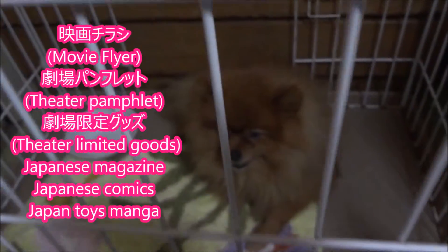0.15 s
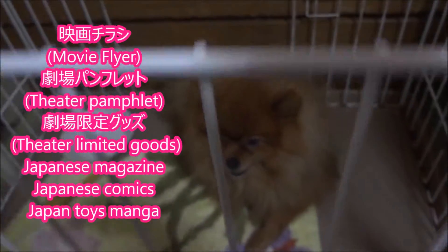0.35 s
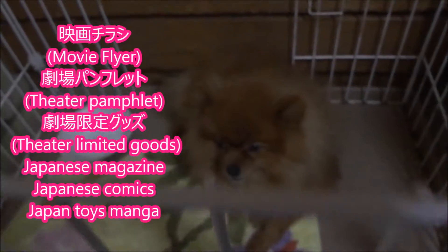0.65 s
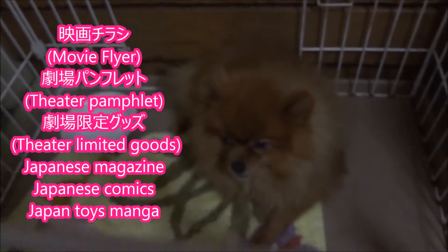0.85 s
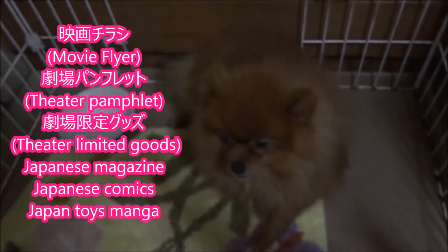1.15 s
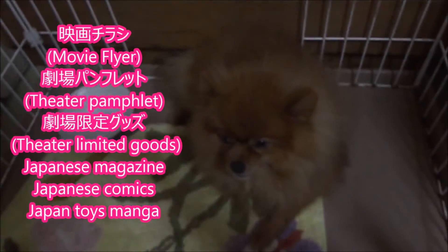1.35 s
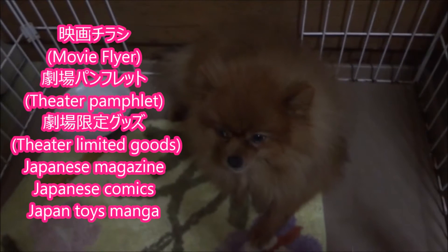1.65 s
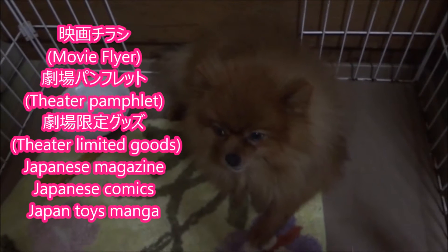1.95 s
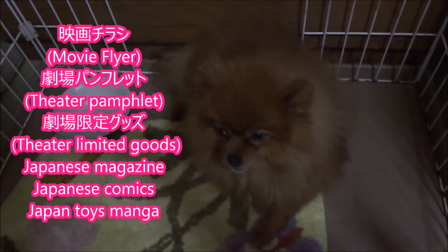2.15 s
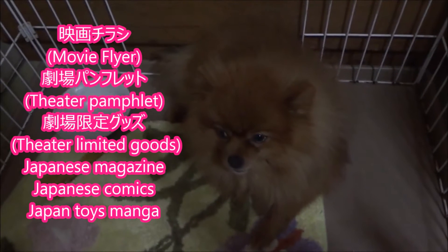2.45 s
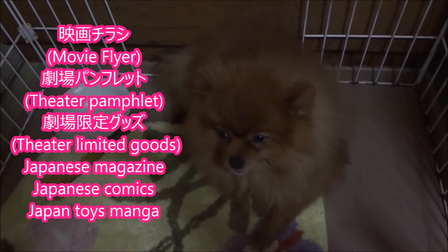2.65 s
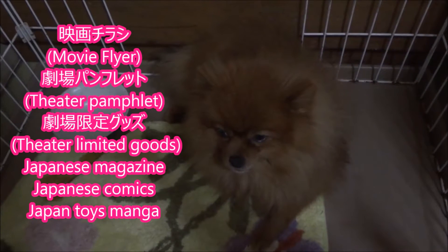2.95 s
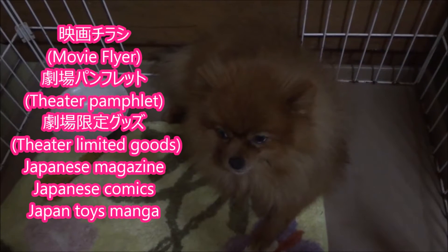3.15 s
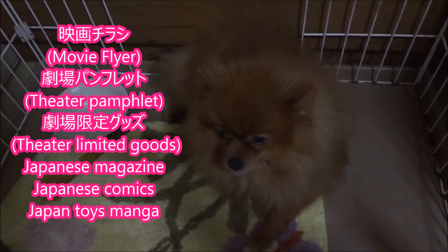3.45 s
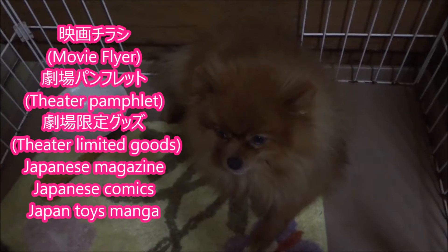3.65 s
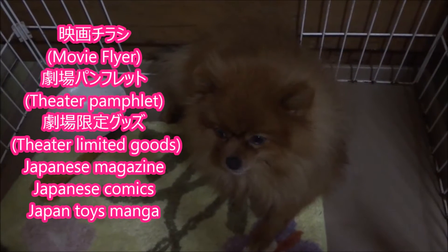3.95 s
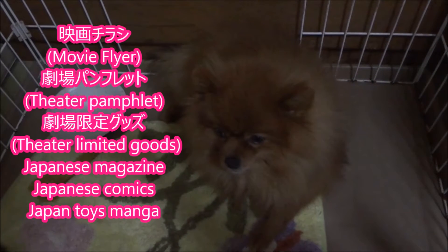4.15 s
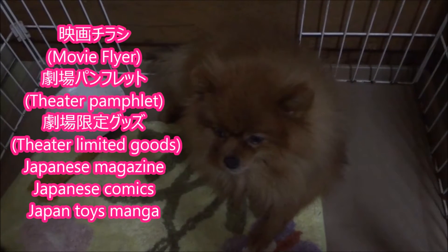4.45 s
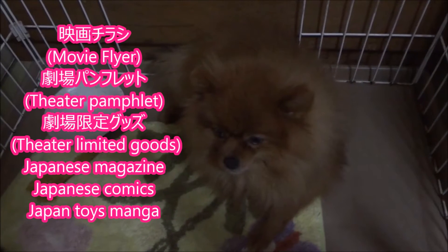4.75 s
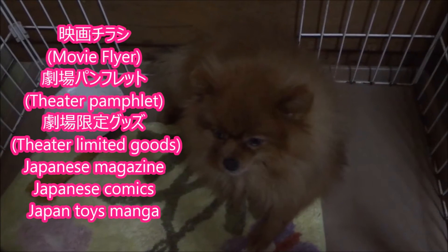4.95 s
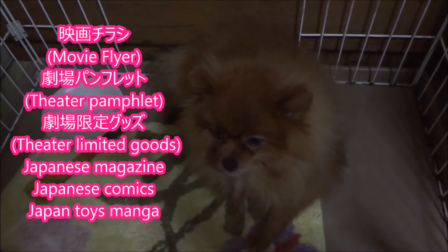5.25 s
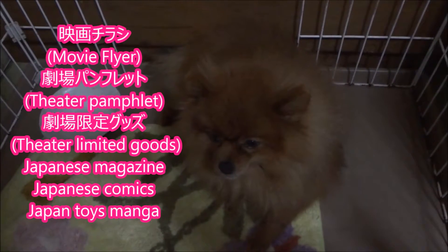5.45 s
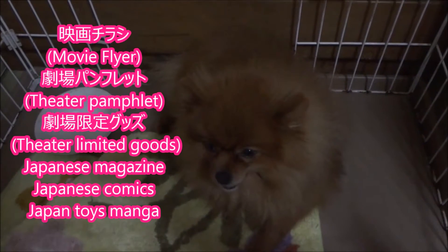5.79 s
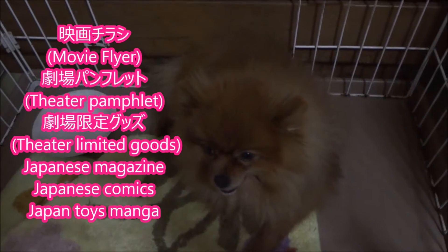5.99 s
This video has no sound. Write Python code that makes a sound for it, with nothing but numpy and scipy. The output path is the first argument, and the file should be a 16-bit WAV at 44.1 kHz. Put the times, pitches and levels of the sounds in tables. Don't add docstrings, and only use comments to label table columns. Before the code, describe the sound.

Indoors, close and nearly centred, a little dog sneezes with a burst of nasal air and a fast rattle, then snorts inward twice, the first with a low throat thump. It growls in a throaty, purring flutter that ends as a steady hum sinking away. A quiet gap leaves only room hiss, mains hum and a very high faint whine. Then dry crackling breath builds into a stronger, rising, toothy growl, cut off at its loudest.

```python
import sys
import numpy as np
from scipy import signal
from scipy.fft import rfft, irfft
from scipy.io import wavfile
from scipy.ndimage import uniform_filter1d

SR = 44100
rng = np.random.default_rng(int(sys.argv[2]) if len(sys.argv) > 2 else 0)


def to_wav(sig):
    pcm = np.clip(np.atleast_2d(sig), -1, 1) * 32767
    pcm = np.round(pcm).astype(np.int16)
    wavfile.write(sys.argv[1], SR, pcm.T)


def voltage_ratio(decibels):
    exponent = np.asarray(decibels, float) / 20
    return 10 ** exponent


N = 269892
T = np.arange(N) / SR
SECOND_GROWL_S = 4.5


def evened(x):
    return x / np.sqrt(np.mean(x ** 2) + 1e-20)


def curve(rows, count=1, quiet=None):
    return np.interp(T, [r[0] for r in rows], [r[count] for r in rows], quiet, quiet)


def level(rows, count=1):
    return voltage_ratio(curve(rows, count=count, quiet=-120))


def read(points, hz):
    f, value = np.transpose(points)
    return np.interp(np.log(hz + 1), np.log(f + 1), value)


def tone(hz, sway=0):
    return np.sqrt(2) * np.sin(2 * np.pi * np.cumsum(hz * np.ones(N)) / SR + sway)


def hiss(spectrum):
    gain = voltage_ratio(read(spectrum, np.fft.rfftfreq(N, 1 / SR)))
    return evened(irfft(rfft(rng.standard_normal(N)) * gain, N))


def wobble(samples):
    slow = uniform_filter1d(rng.standard_normal(N), samples)
    return evened(uniform_filter1d(slow, samples))


def resonate(x, hz, width):
    turn = np.exp(2j * np.pi * np.cumsum(hz * np.ones(len(x))) / SR)
    r = np.exp(-np.pi * width / SR)
    return 2 * (turn * signal.lfilter([(1 - r) ** 2], [1, -2 * r, r * r], x / turn)).real


def tract(x, modes, shift=1):
    return sum((-1) ** k * voltage_ratio(db) * resonate(x, hz * shift, w) for k, (hz, w, db) in enumerate(modes))


def blown(gain, modes, shift=1, pops=0):
    ring = tract(signal.unit_impulse(4096), modes, np.mean(shift))
    air = gain * rng.standard_normal(N) + pops
    end = N - np.argmax(gain[::-1] > 1e-5) + 4096
    sound = tract(air[:end], modes, (shift * np.ones(N))[:end])
    return np.pad(sound, (0, N - len(sound))) / np.linalg.norm(ring)


def growl():
    # (time [s], pitch [Hz])
    pitch_1 = [(1.5, 168.4), (1.55, 175.2), (1.67, 167.4), (1.78, 175.5), (1.85, 195.7), (2.1, 206.6),
               (2.21, 200.5), (2.29, 191.1), (2.77, 183.5)]
    pitch_held = [(2.8, 177.6), (2.91, 174.5), (3.348, 160), (3.406, 154.8), (3.44, 152.2), (3.498, 140.4),
                  (3.524, 132.3), (3.572, 113), (3.6, 108.7)]
    pitch_2 = [(5.5, 194.6), (5.534, 185.2), (5.634, 209.9), (5.708, 208.2), (5.832, 239), (5.98, 242),
               (6.018, 257.7), (6.12, 268.9)]
    # (time [s], pitch [Hz])
    chest_pitch = [(5.2, 198.5), (5.6, 211.9), (5.85, 218.9), (6.12, 234.4)]
    # (time [s], roughness [0-1])
    roughness = [(1.45, .95), (1.56, .33), (1.85, .15), (2.3, .12), (2.75, .08), (2.83, .015), (3.42, .015),
                 (3.6, .12), (5.0, .97), (5.48, .95), (5.62, .18), (5.75, .06), (6.12, .04)]
    # (time [s], upper throat breath [dB], upper overtones [dB], lower throat [Hz])
    lips = [(1.45, -14, 12, 690), (2.72, -14, -27, 668), (2.85, -20, 11, 655), (3.2, -23, 7, 668),
            (3.45, -15, 3, 625), (3.58, -6.5, 9, 592), (5.1, -5, -8, 673), (5.5, -12, -2, 618.5),
            (5.8, -11.5, 11, 719.4), (6.12, -3.5, 25, 734)]
    # (frequency [Hz], level [dB])
    overtones = [(150, 12), (250, 7), (705, 17.5), (873, 11), (1080, -18), (1430, 1.5), (1770, -31),
                 (2130, -31), (2700, -66), (3390, -43), (3670, -58.5), (4660, -72), (6000, -58),
                 (7800, -88), (13200, -120)]
    # (frequency [Hz], level [dB])
    second_dip = [(230, 26), (300, 10.5), (330, 10), (360, -1), (400, -12), (470, -3), (540, 8.5)]
    # (factor on its frequency [1], width [Hz], level [dB])
    throat_low = [(0.938, 160, 8.5), (1.202, 167, -3)]
    # (frequency [Hz], width [Hz], level [dB])
    throat_high = [(1200, 200, -17), (1395, 105, 0), (1670, 130, -16)]

    voice, breath, chest, pops = palate()
    rough = curve(roughness)
    hz = curve(pitch_1 + pitch_held + pitch_2)
    hz = hz * (1 + 0.02954 * rough * wobble(90) + 0.0043 * wobble(600))
    turns = 2 * np.pi * np.cumsum(hz) / SR
    tones, drift = 0, wobble(500)
    for k in range(2, 12):
        upper = np.clip((k * hz - 1000) / 200, 0, 1)
        db = read(overtones, k * hz) + curve(lips, count=2) * upper
        if k == 2:
            db = db + read(second_dip, k * hz)
        db = db + 1.3 * np.roll(drift, 9000 * k)
        tones = tones + voltage_ratio(db) * np.cos(k * turns - .45 * k ** 1.7)
    puffs = breath * (1 + 0.52 * np.cos(turns))

    mouth = np.sqrt(1 - rough) * voice * tones / np.sqrt(uniform_filter1d(tones ** 2, 6000))
    mouth += blown(np.sqrt(rough) * puffs, throat_low, curve(lips, count=3), pops)
    rasp = 0.29 * np.sqrt(rough * (1 - rough)) * puffs
    mouth += blown(rasp, [(1090, 430, 0)])
    mouth += voltage_ratio(curve(lips)) * blown(puffs, throat_high, pops=2.4 * pops)
    windpipe = 0.33 * np.sqrt(rough) * uniform_filter1d(chest, 900)
    mouth += blown(windpipe, [(300, 190, 0)])

    chest_hz = np.where(T < SECOND_GROWL_S, hz, curve(chest_pitch) * (1 + 0.042 * wobble(300)))
    chest_tone = np.sqrt(2) * chest * np.cos(2 * np.pi * np.cumsum(chest_hz) / SR)
    return mouth + chest_tone + nose(breath)


def palate():
    # (time [s], mouth level [dB], chest level [dB])
    held = [(2.785, -28.5, -49), (2.805, -23, -22.5), (2.9, -26.5, -22), (2.96, -27, -22.5),
            (3.341, -29.5, -25.5), (3.441, -33, -28), (3.56, -35.5, -40.5), (3.585, -40.5, -36),
            (3.605, -52.5, -80), (3.66, -65, -77)]
    bounce_s, bounce_db = .018, -9
    voice, breath, chest, pops = level(held), level(held), level(held, count=2), np.zeros(N)
    for s, open_s, mouth_db, chest_db, leak_db in flaps():
        part = slice(round(s * SR), min(round((s + .07) * SR), N))
        t = T[part] - s
        shut = 1 / (1 + np.exp((t - open_s) / .0022))
        fade = np.clip((.055 - t) / 0.0022, 0, 1)

        burst_s = 0.00585 * voltage_ratio(.5 * (leak_db + 15.5))
        voiced = voltage_ratio(mouth_db) * (1 - np.exp(-t / burst_s)) * shut
        voice[part] = np.maximum(voice[part], voiced)

        snap = 1.03 + 0.83 * np.exp(-t / 0.011)
        blowing = voltage_ratio(mouth_db) * np.maximum(snap * shut, 2.57 * voltage_ratio(leak_db) * fade)
        breath[part] = np.maximum(breath[part], blowing)

        swell = np.sin(np.pi / 2 * np.clip(t / (0.95 * open_s), 0, 1)) ** 0.83
        shut_share = 0.19 if s > SECOND_GROWL_S else 0.029
        chesty = voltage_ratio(chest_db) * (swell * shut + shut_share * fade)
        chest[part] = np.maximum(chest[part], chesty)

        pop_db = 4 if s <= SECOND_GROWL_S else 9 if s <= 5.62 else 1
        pop = voltage_ratio(mouth_db - 1.2 * leak_db + pop_db)
        pops[part.start] = pop
        if 5.25 < s < 5.5:
            for k in (1, 2):
                pops[part.start + round(k * bounce_s * SR)] += pop * voltage_ratio(k * bounce_db)
    pops = uniform_filter1d(pops, size=12, origin=-5)
    return uniform_filter1d(voice, 70), breath, uniform_filter1d(chest, 120), pops


def flaps():
    # (time [s], peak level [dB], open share of the gap to the next [0-1])
    flaps_1 = [(1.469, -30, 0.65), (1.482, -31, 0.65), (1.512, -28.5, 0.65), (1.542, -20.5, 0.47),
               (1.582, -19, 0.57), (1.617, -18.5, 0.55), (1.665, -17, 0.42), (1.715, -14.5, 0.42),
               (1.757, -17.5, 0.6), (1.799, -12.5, 0.61), (1.834, -12, 0.64), (1.879, -12.5, 0.62),
               (1.922, -13.5, 0.74), (1.962, -13, 0.63), (2.008, -11.5, 0.7), (2.052, -13.5, 0.9),
               (2.098, -11.5, 0.62), (2.144, -13.5, 0.75), (2.188, -13.5, 0.77), (2.234, -12.5, 0.84),
               (2.277, -14.5, 0.68), (2.335, -13.5, 0.76), (2.378, -14, 0.84), (2.433, -14.5, 0.77),
               (2.48, -14, 0.74), (2.525, -14.5, 0.79), (2.575, -16, 1), (2.622, -14, 0.78),
               (2.675, -14.5, 0.67), (2.734, -13.5, 0.85)]
    flaps_slack = [(5.079, -42.5, 0.1), (5.104, -42.5, 0.21), (5.13, -42, 0.19), (5.146, -36, 0.1),
                   (5.194, -39.5, 0.087), (5.219, -38.5, 0.2), (5.263, -30, 0.27), (5.31, -28.5, 0.14),
                   (5.356, -27.5, 0.24), (5.4, -31, 0.24), (5.428, -34, 0.14), (5.442, -32.5, 0.17),
                   (5.479, -26, 0.26)]
    flaps_2 = [(5.518, -19.5, 0.45), (5.56, -17, 0.33), (5.603, -15.5, 0.36), (5.638, -11.5, 0.42),
               (5.68, -8.5, 0.33), (5.722, -7, 0.45), (5.761, -5.5, 0.46), (5.802, -8.5, 0.56),
               (5.846, -8, 0.47), (5.889, -7.5, 0.49), (5.93, -8.5, 0.5), (5.978, -7.5, 0.44),
               (6.018, -8.5, 0.46), (6.061, -8.5, 0.53), (6.101, -9, 0.46)]
    # (time [s], chest over mouth [dB])
    effort_1 = [(1.468, -25.5), (1.51, -40), (1.546, -2.5), (1.62, -1), (1.76, -2), (1.8, 0), (2.05, 4),
                (2.3, 1.5), (2.75, 2.5)]
    effort_2 = [(5.078, -5), (5.22, -20), (5.265, -7), (5.361, -1), (5.431, -23), (5.479, -4.5),
                (5.52, -1.7), (5.758, -9), (6.11, -7.5)]
    rows = []
    for table, effort, peak_over_effort_db in ((flaps_1, effort_1, 8), (flaps_slack + flaps_2, effort_2, 12)):
        s, peak_db, share = np.transpose(table)
        gap = np.diff(s, append=s[-1] + .05)
        leak_chance, chest_chance = rng.standard_normal((len(s), 2)).T
        mouth = peak_db - peak_over_effort_db
        chest = mouth + np.interp(s, *np.transpose(effort)) + .6 * chest_chance
        share = np.clip(share, .1, 1 - .006 / gap)
        weak = np.clip((-40 - mouth) / 10, 0, 1)
        leak = -24 + 22 * share + 9 * weak + 1.2 * leak_chance
        rows += zip(s, share * gap, mouth, chest, leak)
    return rows


def nose(breath):
    # (time [s], level [dB])
    airflow = [
        [(1.44, -90.5), (1.49, -50.5), (1.6, -46), (2.02, -41), (3.44, -49.5), (3.53, -49.5), (3.6, -56.5),
         (3.66, -72)],
        [(4.76, -75.5), (4.844, -68), (5.034, -72), (5.2, -53.5), (5.286, -59.5), (5.692, -48.5),
         (6.078, -52.5), (6.12, -46)],
    ]
    # (frequency [Hz], level [dB per Hz])
    nostrils = [(8100, -39), (8600, -16.5), (9100, -1), (9700, -4.5), (10600, -2), (11400, -7), (12200, -6),
                (13200, -9.5), (14000, -11), (14450, -28), (14900, -16), (15400, -12.5), (15900, -24.5)]
    nostrils_open = [(3710, -40), (6300, -48), (6470, -16), (6940, -0.5), (7970, -7.5), (8500, -5),
                     (9290, -9), (11000, -9), (11900, -3.5), (13100, -12), (14500, -11), (15200, -7.5),
                     (15800, -16)]
    # (time [s], frequency [Hz])
    nostril_low = [(2.3, 7360), (3.0, 7500), (3.25, 7820), (4.8, 7500)]
    # (frequency [Hz], level [dB per Hz])
    teeth_1 = [(1800, -19.5), (2050, -12), (2400, -28), (2900, -5), (3180, -11), (3300, 2.5), (3450, -16),
               (4400, -6), (5000, -18), (5600, -33)]
    teeth_2 = [(1800, -14), (2100, -16), (2500, -4), (3000, 4), (3400, -20), (3800, -13), (5000, -15),
               (5600, -59)]

    flow = uniform_filter1d(breath, 130) / (uniform_filter1d(breath, 4000) + 1e-5)
    flow = (flow + (breath < 1e-4)) ** .78
    flow = flow / np.sqrt(uniform_filter1d(flow ** 2, 6000)) * voltage_ratio(2.0 * wobble(40))
    drawn = np.clip((T - 5.6) / 0.14, 0, 1) ** 2
    closed = hiss(nostrils) + blown(voltage_ratio(-19) * np.ones(N), [(1, 1100, 0)], curve(nostril_low))
    teeth_2_db = np.interp(drawn, [0, 1], [-18.5, -6.5])
    teeth = np.where(T < SECOND_GROWL_S, voltage_ratio(-16.5) * hiss(teeth_1), voltage_ratio(teeth_2_db) * hiss(teeth_2))
    air = np.sqrt(1 - drawn) * closed + 1.205 * np.sqrt(drawn) * hiss(nostrils_open) + teeth
    between = (T >= 3.68) & (T <= 4.76)
    return level(sum(airflow, [])) * ~between * flow * air


def sneeze_and_snorts():
    ringing, jolts = rattling()
    flutter = (.6 + .9 * jolts) * voltage_ratio(1.5 * wobble(60))
    return whimper() + ringing + sneeze(flutter) + snorts(flutter)


def rattling():
    # (time [s], peak level [dB], ringing [Hz])
    sneeze_high = [(0.2264, -20, 1340), (0.2424, -23, 1340), (0.2568, -20, 1340), (0.2688, -19, 1340),
                   (0.2824, -18, 1340), (0.2952, -15, 1340), (0.3074, -12, 1340), (0.3222, -11, 1340),
                   (0.3344, -18, 1340), (0.3494, -17, 1340), (0.3604, -20, 1340), (0.3724, -25, 1340)]
    sneeze_low = [(0.218, -26, 670), (0.238, -23, 703), (0.251, -23, 673), (0.262, -20, 697),
                  (0.275, -20, 676), (0.384, -23, 705)]
    snort_1 = [(0.753, -53, 3020), (0.799, -43.5, 1940), (0.823, -42, 2010), (0.844, -52, 3020),
               (0.868, -35, 1110), (0.891, -28.5, 1110), (0.913, -23, 1070), (0.937, -25.5, 1130)]
    snort_2 = [(1.1278, -42, 1270), (1.1518, -40, 1410), (1.1752, -38, 1920), (1.1977, -35, 2040),
               (1.2171, -33, 2030), (1.2344, -29, 2030), (1.254, -27, 1920), (1.273, -30, 1920),
               (1.3009, -31, 2040), (1.3179, -28, 2020), (1.3349, -26, 2050)]
    # (time [s], peak level [dB], ringing [Hz])
    clicks = [
        (0.119, -37, 1390),
        (0.16, -34.5, 790),
        (0.49, -51, 1030),
        (1.234, -34, 2590),
        (1.412, -39, 1380),
        (1.454, -38.5, 865),
        (1.451, -42.5, 2740),
        (1.466, -43, 2690),
    ]
    out, jolts = np.zeros(N), np.zeros(N)
    t, push_t = T[:900], T[:3000]
    push = -np.exp(-push_t / 0.008) * np.sin(2 * np.pi * 99 * push_t)
    for s, db, hz in sneeze_high + sneeze_low + snort_1 + snort_2 + clicks:
        grit = rng.standard_normal(900)
        start = round(s * SR)
        part = slice(start, start + 900)
        throat_open = .86 < s < .95
        ring_s = 0.0013 if throat_open else .0036 if hz > 900 else 0.0029
        shape = (1 - np.exp(-t / (.4 * ring_s))) ** 2 * np.exp(-t / ring_s)
        shape = shape / shape.max()
        ring = np.sin(2 * np.pi * hz * t) + .22 * evened(resonate(grit, hz, 780))
        out[part] += voltage_ratio(db - 1) * shape * ring
        if throat_open:
            out[start:start + 3000] += voltage_ratio(db - 4.5) * push
        if .2 < s < 1:
            out[part] += voltage_ratio(db - 12) * np.exp(-t / 0.001) * uniform_filter1d(grit, size=9)
        jolts[part] += shape
    return out, jolts


def sneeze(flutter):
    # (time [s], level [dB])
    effort = [(0.0, -45.5), (0.15, -58), (0.188, -31), (0.206, -44), (0.224, -27), (0.326, -18),
              (0.385, -22.5), (0.45, -44), (0.55, -41.5)]
    # (frequency [Hz], width [Hz], level [dB])
    nose_modes = [(698, 320, -2.5), (1080, 180, 0.5), (1335, 185, -0.5)]
    # (frequency [Hz], level [dB per Hz])
    rush = [(1060, -46), (1800, 6), (1950, -6), (2430, -11.5), (3050, 2.5), (3790, -17), (4430, -7),
            (5920, -11.5), (6140, -22.5), (6850, -13), (7710, -20.5), (10700, -13.5), (15800, -27)]
    # (time [s], pitch [Hz])
    grunt = [(.17, 223), (.25, 193), (.32, 139), (.4, 105.3), (.5, 100)]
    # (time [s], level [dB])
    sniff = [(0, -63), (.14, -62), (.17, -50), (.22, -45.5), (.24, -88)]
    force = level(effort)
    out = blown(.3 * flutter * force, nose_modes)
    out += blown(force ** 1.324 * voltage_ratio(-2), [(1, 45, -6.5), (1.9, 120.5, -19)], curve(grunt))
    out += blown(level(sniff), [(7000, 470, 1.5), (10800, 4400, -10)])
    return out + (T < effort[-1][0]) * force ** .85 * voltage_ratio(-18) * flutter * hiss(rush)


def snorts(flutter):
    # (time [s], level [dB])
    breath_1 = [(0.72, -59), (0.762, -49), (0.822, -46), (0.898, -48.5), (0.942, -41.5), (0.98, -46),
                (1.02, -53)]
    breath_2 = [(1.08, -51.5), (1.17, -49.5), (1.26, -37), (1.346, -36.5), (1.38, -44.5), (1.41, -48)]
    # (time [s], level [dB])
    thump = [(.82, -52), (.865, -42.5), (.9, -34), (.942, -22.5), (.99, -38)]
    # (frequency [Hz], width [Hz], level [dB])
    nose_1 = [(2000, 170, -2.5), (2600, 180, -0.5), (2940, 180, -0.5), (3300, 290, -6), (4360, 1000, -14)]
    nose_2 = [(910, 120, -15.5), (1380, 190, -9.5), (1940, 99, -3.5), (2740, 380, -9), (3430, 180, -19),
              (4360, 460, -21.5)]
    throat_1 = [(720, 420, -8), (1170, 380, -1)]
    out = blown(0.6 * flutter * level(breath_1), nose_1)
    out += blown(.3 * flutter * level(thump), throat_1)
    return out + blown(.6 * flutter * level(breath_2), nose_2)


def whimper():
    # (time [s], level [dB], pitch [Hz])
    glide = [(.12, -61, 807), (.135, -50.5, 780), (.17, -46.5, 768), (.2, -37, 720), (.215, -51, 720)]
    return level(glide) * tone(curve(glide, count=2))


def room(x):
    taps = np.zeros((2, 9000))
    slots = np.arange(150, 8960, 22)
    at = slots + rng.integers(0, 22, (2, len(slots)))
    np.put_along_axis(taps, at, rng.choice([-1., 1.], at.shape), 1)
    taps *= voltage_ratio(-60 * T[:9000] / .3)
    band = signal.butter(1, [260, 10000], "band", fs=SR, output="sos")
    thin = signal.sosfilt(band, x)
    return signal.fftconvolve(thin[None], taps / np.linalg.norm(taps[0]), axes=1)[:, :N]


def floor():
    # (frequency [Hz], level [dB per Hz])
    hiss_shape = [(12, -64), (20, -34), (32, -20), (44, 0), (65, -9.5), (76, -8), (88, -16.5), (145, -24),
                  (365, -20.5), (555, -19.5), (714, -19.5), (1440, -20.5), (1610, -21.5), (13400, -43),
                  (15900, -48)]
    # (frequency [Hz], likeness [0-1])
    likeness = [(60, 0.76), (200, 0.68), (900, 0.63), (4000, 0.87), (15000, 0.32)]
    # (frequency [Hz], phase [rad])
    lead = [(60, 1.5), (520, -3), (860, -2.5), (4820, -5), (9300, -5.5), (15600, 35.5)]
    hz = np.fft.rfftfreq(N, 1 / SR)
    left, other = rfft(rng.standard_normal((2, N)))
    same = np.clip(read(likeness, hz), 0, 1)
    right = same * left * np.exp(1j * read(lead, hz)) + np.sqrt(1 - same ** 2) * other
    air = irfft(np.array([left, right]) * voltage_ratio(read(hiss_shape, hz)) * (hz > 75), N)
    low = voltage_ratio(-66.0) * hiss([(15, -17.0), (30, -11.5), (50, -21.5), (75, -12.5), (90, -39.0)])
    hum = voltage_ratio(-58.5 + 1.3 * wobble(3000)) * tone(61, 0.39 * wobble(3000))
    tube = voltage_ratio(-73 + 1.5 * wobble(2000)) * tone(15735)
    return voltage_ratio(-57) * evened(air) + low + hum + tube


def scene():
    dog = growl() + sneeze_and_snorts()
    direct = dog * voltage_ratio([[.1], [-.1]])
    return direct + voltage_ratio(-15) * room(dog) + floor()


def band_limit(x):
    return signal.sosfilt(signal.butter(12, 16010, fs=SR, output="sos"), x)


def record(dry):
    edge = signal.firwin(511, 15950, window=("kaiser", 9), fs=SR)
    mix = signal.oaconvolve(dry, edge[None], "same")
    return band_limit(mix)


dry = scene()
out = record(dry)
to_wav(out)
```